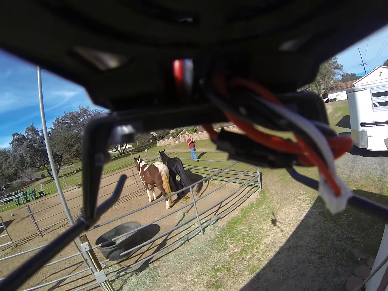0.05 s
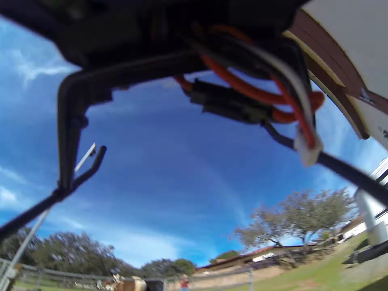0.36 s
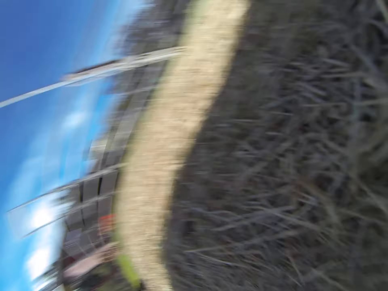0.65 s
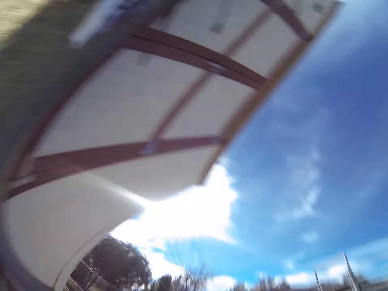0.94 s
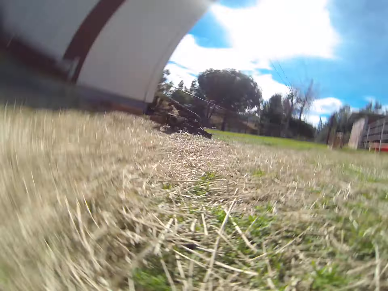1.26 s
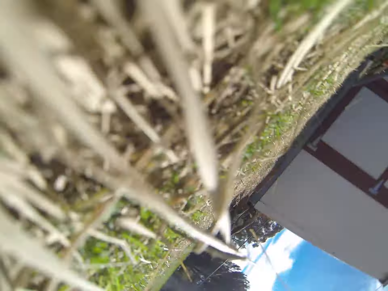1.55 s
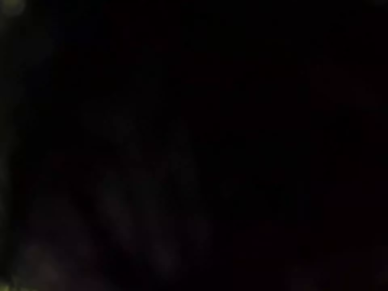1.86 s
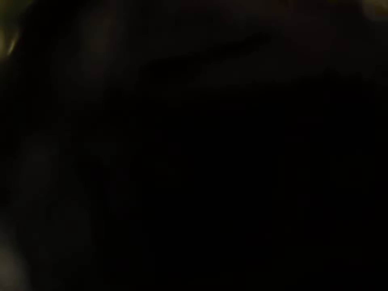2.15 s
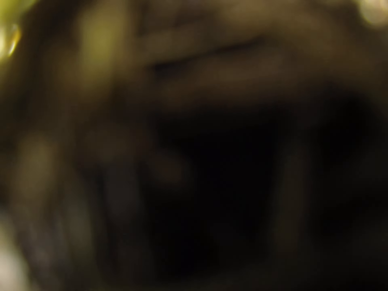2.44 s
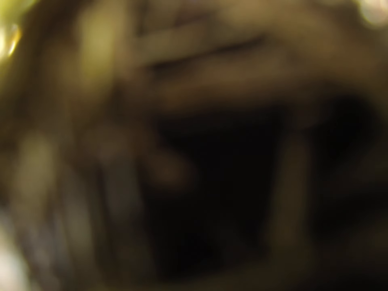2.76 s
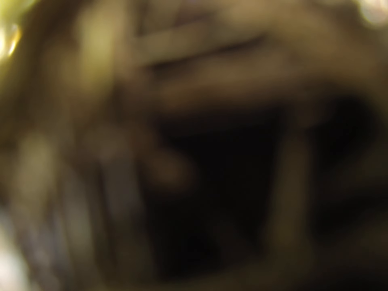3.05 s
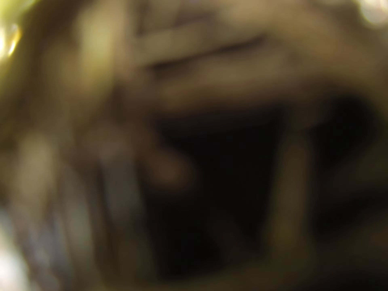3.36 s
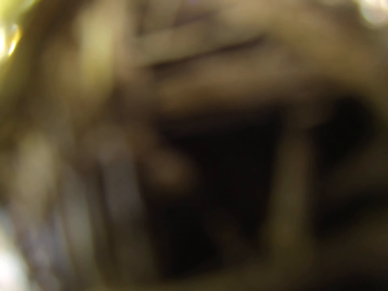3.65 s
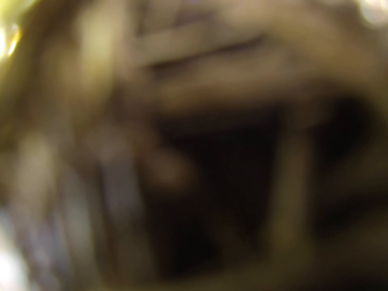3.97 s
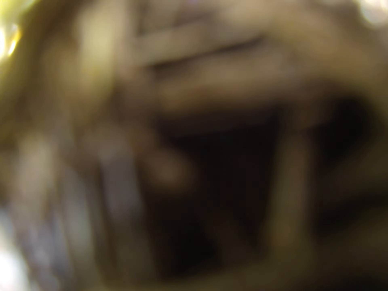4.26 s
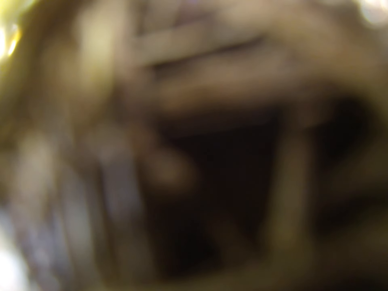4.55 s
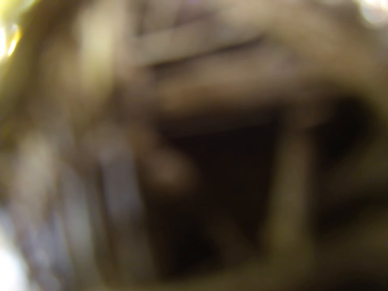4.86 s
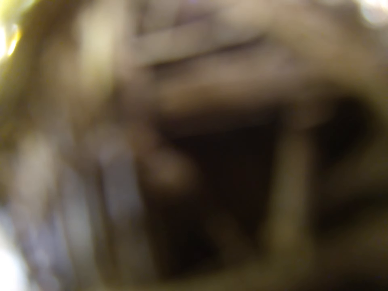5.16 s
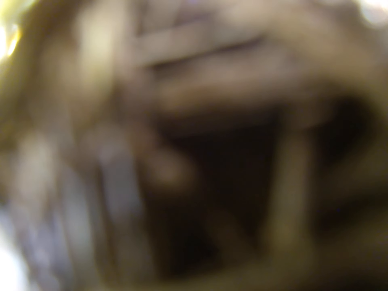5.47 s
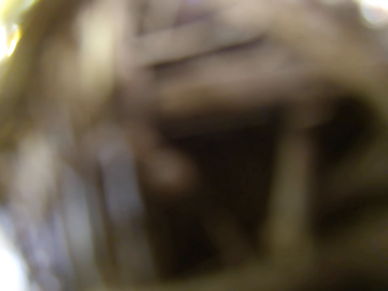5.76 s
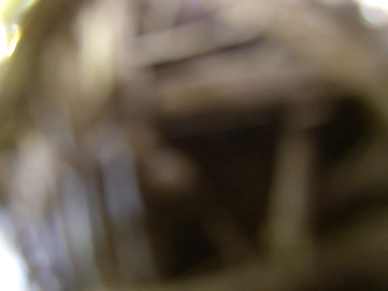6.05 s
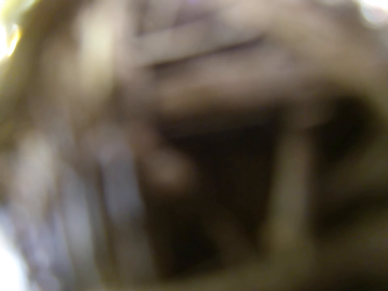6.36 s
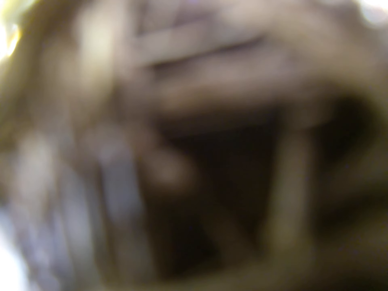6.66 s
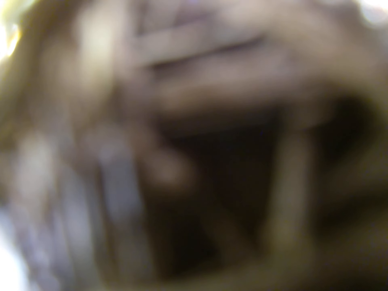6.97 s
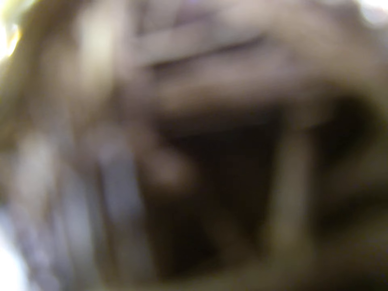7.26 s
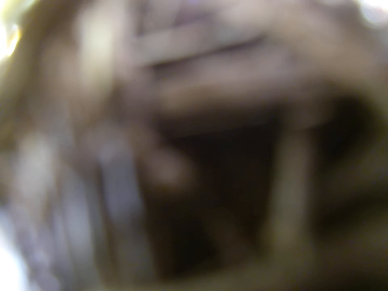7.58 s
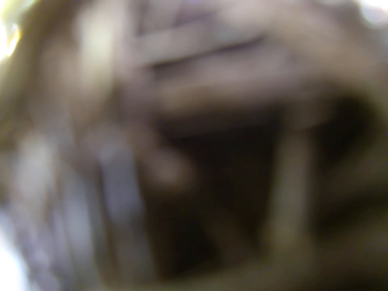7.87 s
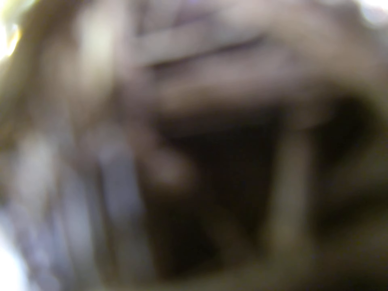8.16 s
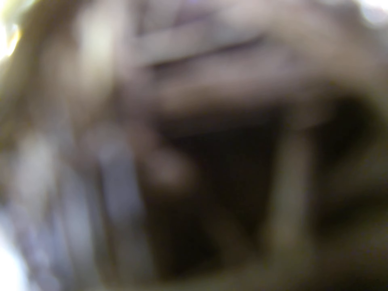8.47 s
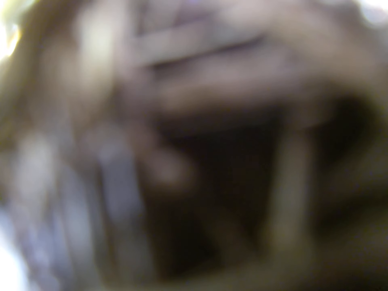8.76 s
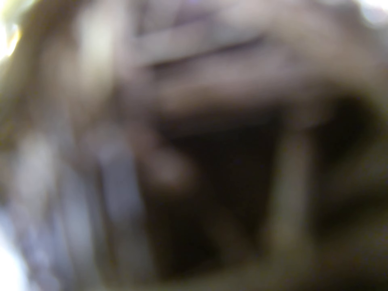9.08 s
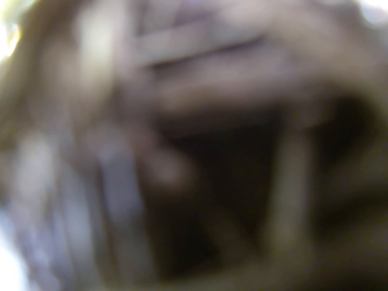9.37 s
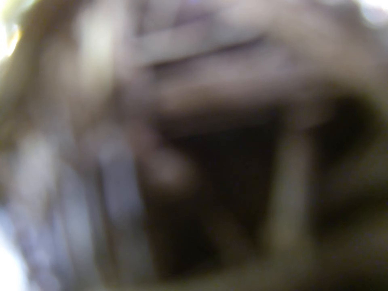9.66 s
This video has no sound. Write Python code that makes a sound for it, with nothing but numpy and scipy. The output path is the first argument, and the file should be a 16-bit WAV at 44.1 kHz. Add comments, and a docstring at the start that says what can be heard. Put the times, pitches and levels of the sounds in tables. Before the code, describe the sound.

Heard from on board, a model helicopter's rotors strike a wall and it crashes onto grass; then faint distant engines and soft footsteps.

```python
"""First comes the rasp of a small model helicopter, heard from on board, as its rotors grind along a wall.
The motors squeal, the plastic frame clatters, and air buffets the microphone, there and as it tumbles.
The craft thumps over dry grass, crushing the stalks, and settles. That leaves a quiet yard:
a machine hum, far engines and road noise, a whistling bird, and footsteps in the grass coming nearer."""
import sys
import numpy as np
from scipy import signal
from scipy.fft import rfft, irfft, next_fast_len
from scipy.io import wavfile

SR = 44100
rng = np.random.default_rng(int(sys.argv[2]) if len(sys.argv) > 2 else 0)


def to_wav(sig):
    """Store sig (one row per channel, or 1-D mono) as 16-bit WAV at the path in sys.argv[1].

    Samples outside -1..1 are clipped; the rate is SR.
    """
    pcm = np.clip(np.atleast_2d(sig), -1, 1) * 32767
    pcm = np.round(pcm).astype(np.int16)
    wavfile.write(sys.argv[1], SR, pcm.T)  # frames by channels


N = 433062
TIME = np.arange(N) / SR
FFT_SIZE = next_fast_len(N, real=True)
FREQS = np.fft.rfftfreq(FFT_SIZE, 1 / SR)


def amp(db):
    """Turns decibels into a number to multiply a sound by."""
    return np.exp(np.asarray(db) * (np.log(10) / 20))


def unit(x):
    """Scales a sound so that its average strength (rms) is 1."""
    return x / np.sqrt(np.mean(x ** 2) + 1e-20)


def colour(points):
    """Joins (Hz, dB) points into a gain for every frequency."""
    hz, db = np.transpose(points)
    return amp(np.interp(np.log(FREQS + 1), np.log(hz + 1), db))


def resonances(rows):
    """Gain for every frequency of an object that rings at the given (Hz, width in Hz, dB) peaks."""
    return sum(amp(db) / (1 + 2j * (FREQS - hz) / width) for hz, width, db in rows)


def shaped(x, gain):
    """Filters a full-length sound by a gain for every frequency, then scales it to strength 1."""
    return unit(irfft(rfft(x, FFT_SIZE) * gain, FFT_SIZE)[:N])


def band(x, hz, kind, order=2):
    """Keeps the "low" or the "high" side of hz."""
    return signal.sosfilt(signal.butter(order, min(hz, SR / 2 - 1), kind, fs=SR, output="sos"), x)


def treble(x, hz):
    """The part of a full-length sound above hz."""
    return x - irfft(rfft(x, FFT_SIZE) / (1 + (FREQS / hz) ** 4), FFT_SIZE)[:N]


def drift(hz):
    """A random wobble of strength 1, up to about hz times a second."""
    values = rng.standard_normal(16384)
    return unit(np.interp(TIME * hz * 2, np.arange(len(values)), values))


def grains(per_s, spread_db, hiss):
    """Random clicks of uneven size over a share of smooth hiss."""
    size = amp(spread_db * np.minimum(rng.exponential(1, N), 4))
    clicks = size * rng.choice([-1, 1], N) * (rng.random(N) < per_s / SR)
    return unit(unit(clicks) + hiss * rng.standard_normal(N))


def swells(times, heights, rise_s, fade_s, hold_s=0):
    """A loudness curve made of swells that each grow up to their time, hold, and die away."""
    out = np.zeros(N)
    for s, height, rise, fade, hold in np.broadcast(times, heights, rise_s, fade_s, hold_s):
        near = slice(max(int((s - 16 * rise) * SR), 0), int((s + hold + 16 * fade) * SR))
        t = TIME[near] - s
        out[near] += height * np.exp(np.minimum(np.minimum(t / rise, (hold - t) / fade), 0))
    return out


def until(s, fade_s):
    """Full loudness up to the time s, then dying away."""
    return np.exp(-np.clip((TIME - s) / fade_s, 0, 40))


def add_centred(mix, s, sound):
    """Mixes a sound in with its middle at the time s."""
    start = round(s * SR) - len(sound) // 2
    sound = sound[max(-start, 0):]
    part = mix[max(start, 0):][:len(sound)]
    part += sound[:len(part)]


def glides(rows, waver):
    """Short sliding tones whose pitch wavers by the given share."""
    out = np.zeros(N)
    for s, db, start_hz, end_hz, length in rows:
        shake = unit(band(rng.standard_normal(SR), 300, "low"))[:int(length * SR)]
        hz = np.linspace(start_hz, end_hz, len(shake)) * (1 + waver * shake)
        tone = np.sqrt(2) * np.sin(2 * np.pi * np.cumsum(hz) / SR)
        add_centred(out, s, amp(db) * np.hanning(len(hz)) * tone)
    return out


# The tone colour of the gears and blades. Each row: frequency in Hz, relative level in dB.
RASP_COLOUR = [(200, -26), (400, -1.5), (700, 2), (950, -10), (1350, -11), (1650, -4.5), (2400, -9.5),
               (4000, -11), (6000, -10), (9000, -13), (13000, -19.5), (15500, -28)]
# The ringing of the arms. Each row: pitch in Hz, width in Hz, relative level in dB.
ARM_RINGS = [(1660, 220, -7.5), (2215.6, 110, 9), (3030, 120, -8.5), (4180, 220, -3.5), (7740, 1300, -11),
             (9083, 400, -11)]


def rotors(stall_s=.113, coast_end_s=.9):
    """Gears and blades rasp through the ringing arms and throb as they wobble, until a blade catches."""
    throb_hz = 52 * (1 + .3 * drift(hz=7.6))
    throb = 1 + .19 * np.sin(2 * np.pi * np.cumsum(throb_hz) / SR)
    rasp = shaped(rng.standard_normal(N), colour(RASP_COLOUR) * (1 + 1.5 * resonances(ARM_RINGS)))
    rasp *= amp(1.2 * drift(hz=218))
    looseness = np.interp(TIME, [.1, .6], [amp(-13.5), amp(-1)])  # the blows shake the parts loose
    rattling = looseness * rattle(count=16, per_s=220, low_hz=2060, high_hz=4080)
    powered = amp(-20.5) * until(stall_s, fade_s=.002)
    coasting = amp(-48) * until(coast_end_s, fade_s=.04)
    return (rasp + rattling) * throb * (powered + coasting)


def rattle(count, per_s, low_hz, high_hz):
    """Loose parts chirp at random, each with a short falling ring at its own pitch."""
    out, t = np.zeros(N), np.arange(900) / SR
    span = 2 * SR
    envelope = np.exp(-t / .004) * (1 - np.exp(-t / .00065))
    for hz in np.geomspace(low_hz, high_hz, count):
        ring = envelope * np.sin(2 * np.pi * hz * t * (1 - 2 * t))
        taps = rng.uniform(.36, 1, span) * (rng.random(span) < per_s / count / SR)
        out[:span] += signal.oaconvolve(taps, ring)[:span]
    return out / np.std(out[:span])


# Motor squeals. Each row: middle in seconds, level in dB, first and last pitch in Hz, length in seconds.
MOTOR_SQUEALS = [(.022, -32.5, 1750, 1600, .06), (.032, -30.5, 2750, 1800, .06),
                 (.044, -23.5, 4350, 3250, .04), (.062, -30, 3550, 2950, .03),
                 (.094, -25.5, 4300, 3400, .04), (.09, -30, 2450, 1650, .05),
                 (.095, -33.5, 6200, 5300, .04)]


def squeals():
    """The motors squeal downward as the wall brakes them."""
    return glides(MOTOR_SQUEALS, waver=.012)


# Gusts on the microphone. Each row: middle in seconds, level in dB, half length in seconds,
# brightness in Hz (the gust's two treble cuts sit below and above it).
AIR_GUSTS = [(0.056, -23.5, 0.063, 116), (0.157, -16.5, 0.0044, 298), (0.393, -19.5, 0.071, 171),
             (0.571, -21.5, 0.037, 240), (0.647, -26.5, 0.014, 235), (.75, -20, .011, 247.5),
             (0.846, -17, 0.0087, 456), (.917, -11, 0.01, 405), (1.009, -14, 0.02, 185),
             (1.075, -17.5, 0.0054, 223), (1.18, -26, 0.0061, 285), (1.222, -17.5, 0.016, 270)]


def gusts():
    """Air buffets the microphone along the wall, then in short gusts during the tumble."""
    out, t = np.zeros(N), np.arange(-4096, 4096) / SR
    for s, db, half_s, brightness_hz in AIR_GUSTS:
        speed = np.exp(-(t / half_s) ** 2 / 2)
        swirls = band(rng.standard_normal(len(t)), 31, "high")
        dull = unit(band(swirls, brightness_hz * .6, "low", order=3))
        bright = unit(band(swirls, brightness_hz * 1.476, "low", order=4))
        gust = unit(speed * dull + .64 * speed ** 2 * bright)  # brightest in the middle
        add_centred(out, s, amp(db) * gust * np.sqrt(np.mean(speed ** 2)))
    return out


def sway(fall_end_s=1.06, roll_start_s=1.22):
    """Tumbling slowly pushes the air: a deep rumble that grows in the fall and is weaker in the roll."""
    deep = colour([(4, -22.5), (12, -3), (25, -9), (50, -18.5), (150, -54), (600, -110)])
    rumble = shaped(rng.standard_normal(N), deep)
    falling = amp(-30 + 11.5 * np.minimum(TIME, fall_end_s)) * until(fall_end_s, fade_s=.03)
    rolling = swells(roll_start_s, amp(-35.5), rise_s=.03, fade_s=.03, hold_s=.7)
    return rumble * (falling + rolling)


# The tone colour of rubbed or struck plastic. Each row: frequency in Hz, relative level in dB.
PLASTIC_COLOUR = [(60, -21.5), (130, -4), (300, -4.5), (750, -3.5), (1100, -7.5), (2200, -8.5),
                  (4000, -14.5), (6000, -19.5), (12500, -25.5), (15500, -35.5)]
# The ringing of the frame. Each row: pitch in Hz, width in Hz, relative level in dB.
FRAME_RINGS = [(490.3, 99, 4), (744, 140, -7.5), (1618, 65, 1), (2180, 190, 11), (2740, 84, -3.5),
               (4260, 400, -4)]


def through_frame(x, ringing=.47):
    """Whatever touches the plastic frame sets off the same short rings."""
    return shaped(x, colour(PLASTIC_COLOUR) * (1 + ringing * resonances(FRAME_RINGS)))


# Blows on the frame. Each row: time in seconds, level in dB, bass boost in dB.
FRAME_BLOWS = [(.112, -9, -1), (0.138, -18, -3), (.152, -8.5, -5), (0.186, -20.5, -10), (.204, -21.5, 2),
               (0.3269, -12.5, 3), (0.3728, -13, 5), (0.467, -36.5, 19), (0.5273, -3, -4.5),
               (0.556, -18.5, 9), (.574, -17.5, 2.5), (.5913, -35, 8), (0.616, -25.5, 13.5),
               (0.837, -29, -19), (.875, -39, -6), (0.899, -33.5, -5), (.985, -45, -6), (1.0222, -48.5, 9),
               (1.132, -53, -6), (1.4459, -13, 0.5)]


def knocks():
    """Each blow cracks through the frame; lighter blows are thinner ticks."""
    s, db, bass_db = np.transpose(FRAME_BLOWS)
    treble_db = 2 - .2743 * db
    crack = through_frame(rng.standard_normal(N))
    bass, top = band(crack, 900, "low"), treble(crack, 5000)
    parts = [(crack, 1), (bass, amp(bass_db) - 1), (top, amp(treble_db) - 1)]
    return sum(part * swells(s, amp(db) * share, rise_s=.00014, fade_s=.0045) for part, share in parts)


# Jolts to the frame. Each row: middle in seconds, level in dB, pitch in Hz, half length in seconds,
# slide as a share of the pitch per second.
FRAME_JOLTS = [(0.1182, -1.5, 439, 0.0036, 38), (.5582, -4, 776, 0.0012, 1), (.9153, -2.5, 436, 0.0015, -3),
               (1.007, -11, 450, 0.00063, 0)]


def judders():
    """A caught blade or a hard jolt shakes the frame for a few cycles; bending shifts its pitch."""
    out, t = np.zeros(N), np.arange(-900, 900) / SR
    for s, db, hz, half_s, slide in FRAME_JOLTS:
        shake = np.sin(2 * np.pi * hz * (t + slide * t ** 2 / 2))
        add_centred(out, s, amp(db) * np.exp(-(t / half_s) ** 2 / 2) * shake)
    return out


# Scrapes on the wall. Each row: start in seconds, length in seconds, level in dB.
WALL_SCRAPES = [(0.128, 0.1, -28.5), (0.259, .055, -26), (0.332, .062, -24.5), (.475, .04, -42.5),
                (0.528, .047, -19)]


def scrapes():
    """The frame drags along the wall with a gritty, uneven rub."""
    start, length, db = np.transpose(WALL_SCRAPES)
    contact = swells(start, amp(db), rise_s=.0013, fade_s=.01, hold_s=length)
    rub = through_frame(grains(per_s=2200, spread_db=2, hiss=.7))
    return rub * contact * amp(2.2 * drift(hz=131.4))


def ticks():
    """Loose plastic parts tick faintly at random while the craft tumbles."""
    clicks = through_frame(grains(per_s=350, spread_db=5, hiss=.1), ringing=2.8)
    thin = unit(band(clicks, 1700, "high") + .58 * treble(clicks, 6000))
    return thin * swells(.132, amp(-53.5), rise_s=.02, fade_s=.091, hold_s=.82)


# Bounces, first off the wall, then on the turf. Each row: time in seconds, thump peak in dB, rise in
# seconds, push (1) or pull (-1) on the air, crackle level in dB, crackle length in seconds.
CRAFT_BOUNCES = [(.577, -5.5, .0004, -1, -34, .002), (1.0918, 0.5, 0.00089, -1, -30.5, 0.0043),
                 (1.3153, 6.5, .0007, -1, -25.5, 0.0038), (1.4659, -1.5, 0.0011, 1, -19, 0.011),
                 (1.517, -17, 0.0013, -1, -48.5, 0.0057), (1.655, 2, 0.00092, 1, -22, 0.0049),
                 (1.749, -7, 0.0013, 1, -24.5, 0.014), (1.899, -8.5, 0.00012, 1, -26, 0.0019)]


def thumps(release_per_rise=8.2):
    """Each bounce jolts the air at the microphone quickly and lets it go slowly."""
    out, t = np.zeros(N), np.arange(-2048, 2048) / SR
    for s, db, rise, sign, _, _ in CRAFT_BOUNCES:
        pulse = np.exp(-np.logaddexp(-t / rise, t / (rise * release_per_rise)))
        push = np.gradient(pulse)
        add_centred(out, s, sign * amp(db) * push / push.max())
    return out


def thuds(pitch_hz=420, width_hz=300):
    """The frame answers each bounce with a short, dull thud, quieter than the thump."""
    s, thump_db = np.transpose(CRAFT_BOUNCES)[:2]
    ring = shaped(rng.standard_normal(N), resonances([(pitch_hz, width_hz, 0)]) ** 2)
    return ring * swells(s, amp(thump_db - 23.5), rise_s=.0038, fade_s=.0031)


# The tone colour of the dry crackle. Each row: frequency in Hz, relative level in dB.
CRACKLE_COLOUR = [(180, -42), (300, 2), (391, -6), (600, -0.5), (1970, -3), (2170, -2), (2830, -6),
                  (7250, -8), (12100, -12), (15500, -17.5)]
# Lurches as the craft slides through the grass. Each row: time in seconds, level in dB, rise in seconds.
GRASS_LURCHES = [(1.201, -57, 0.02), (1.746, -29.5, 0.011), (1.872, -28, .025), (1.964, -34, 0.012),
                 (2.002, -50, .008), (2.045, -42.5, 0.0048)]


def crackles(faint_lead_s=.028):
    """A dry crackle comes just before each thump; on the turf and in the slide it is crushed stalks."""
    s, _, _, _, db, loud_s = np.transpose(CRAFT_BOUNCES)
    faint_s = loud_s + faint_lead_s
    faint = swells(s - faint_s, amp(db - 26), rise_s=.008, fade_s=.011, hold_s=faint_s)
    loud = swells(s - loud_s, amp(db), rise_s=.0007, fade_s=.0016, hold_s=loud_s)
    s, db, rise_s = np.transpose(GRASS_LURCHES)
    slide_power = swells(s, amp(db) ** 2, rise_s / 2, fade_s=.0195)
    crackle = shaped(grains(per_s=2000, spread_db=4, hiss=1), colour(CRACKLE_COLOUR))
    return crackle * np.sqrt(faint ** 2 + loud ** 2 + slide_power)  # overlapping noises add in power


# Breaking stalks. Each row: start in seconds, peak in dB, middle frequency in Hz.
STALK_SNAPS = [(1.098, -24.5, 8500), (1.777, -25, 3000), (1.786, -23, 9100), (1.815, -18.5, 11400),
               (1.834, -24, 12000), (1.8526, -19, 2150), (1.958, -27, 3000), (2.041, -28, 2380),
               (2.058, -26, 3100), (2.1112, -36.5, 3930), (3.291, -47, 6430), (5.523, -40, 2180),
               (9.019, -26, 1590)]


def snaps():
    """Single stalks snap, each a tiny burst of noise one octave wide."""
    out, t = np.zeros(N), np.arange(-600, 600) / SR
    for s, db, hz in STALK_SNAPS:
        burst = rng.standard_normal(len(t)) * np.exp(-abs(t) / .0018) * (t >= 0)
        thin = band(burst, hz / np.sqrt(2), "high")
        snap = band(thin, hz * np.sqrt(2), "low", order=4)
        add_centred(out, s, amp(db) * snap / abs(snap).max())
    return out


# The tone colour of the open air. Each row: frequency in Hz, relative level in dB.
AIR_COLOUR = [(12, -22.5), (25, 5), (60, 2.5), (130, -10.5), (300, -14), (500, -26.5), (1000, -27.5),
              (2500, -32.5), (4200, -39.5), (6000, -47.5), (8300, -51.5), (12500, -61), (14000, -68),
              (15500, -79.5)]


def open_air():
    """The air in the yard makes a soft, low rush."""
    return amp(-44) * shaped(rng.standard_normal(N), colour(AIR_COLOUR))


# The tones of a far machine. Each row: pitch in Hz, level in dB before the boost.
MACHINE_TONES = [(468.3, -69.5), (549.1, -69.5), (602.9, -70.5), (877.5, -77), (904.4, -73), (1012, -71.5),
                 (1039, -69), (1152, -80.5), (1206, -77.5), (1346, -78), (1373, -74.5), (1480, -74),
                 (1949, -78.5), (2010, -79), (2412, -76.5)]


def machine_hum(boost_db=3):
    """A far machine hums steady tones, each growing louder and softer by itself."""
    out, moments = np.zeros(N), np.linspace(0, TIME[-1], 24)
    for hz, db in MACHINE_TONES:
        fading, wander = (np.interp(TIME, moments, v) for v in rng.standard_normal((2, len(moments))))
        out += amp(db + boost_db + 2.2 * fading) * np.sin(2 * np.pi * hz * TIME + 1.2 * wander)
    return out


# The tone colour of a far road. Each row: frequency in Hz, relative level in dB.
ROAD_COLOUR = [(25, 8.5), (75, -6), (200, -2), (350, 0), (700, -12.5), (1500, -23), (5000, -45)]
# How loud the road is. Each row: time in seconds, level in dB before the boost.
ROAD_LEVELS = [(2, -61), (3.9, -57), (7.3, -57), (8.9, -51.5), (9.82, -50.5)]


def road(boost_db=2):
    """Far traffic rumbles, slowly growing louder."""
    s, db = np.transpose(ROAD_LEVELS)
    loudness = amp(boost_db + np.interp(TIME, s, db, left=-140, right=-140))
    return loudness * shaped(rng.standard_normal(N), colour(ROAD_COLOUR))


# Far engines, one list for each. Each row: time in seconds, firings per second, level in dB.
FAR_ENGINES = [
    [(6.9, 78, -46), (7.8, 73.2, -40), (8.1, 75.3, -50), (8.6, 75.2, -40), (9.82, 73.9, -46.5)],
    [(2, 149.6, -52), (3, 150.8, -49.5), (3.6, 150.9, -60.5), (5, 151.2, -57), (6.3, 151.7, -56.5)],
    [(5.6, 86, -42), (5.9, 97, -51), (6.4, 106.7, -44.5), (6.8, 110.6, -46.5)],
    [(7.95, 285.6, -52), (8.3, 309.8, -54), (8.85, 335.3, -54)],
]


def engines():
    """Each far exhaust gives a slightly wavering firing tone and a weaker tone an octave up."""
    out = np.zeros(N)
    for rows in FAR_ENGINES:
        s, hz, db = np.transpose(rows)
        firing_hz = np.interp(TIME, s, hz) * (1 + .00489 * drift(hz=4.4))
        phase = 2 * np.pi * np.cumsum(firing_hz) / SR
        heard = swells(s[0], 1, rise_s=.17, fade_s=.17, hold_s=s[-1] - s[0])
        loudness = amp(np.interp(TIME, s, db) + 1.2 * drift(hz=5))
        out += heard * loudness * (np.sin(phase) + amp(-13.5) * np.sin(2 * phase))
    return out


# The wreck's slips. Each row: time in seconds, level in dB.
WRECK_SLIPS = [(2.426, -42), (2.443, -45.5), (2.462, -47), (2.479, -51)]
# The tone colour of the turf under it. Each row: frequency in Hz, relative level in dB.
TURF_COLOUR = [(350, -30), (700, 9), (1100, -3.5), (2300, 4), (3200, -9), (5500, -20.5), (7500, -24),
               (9000, -31), (15000, -42.5)]


def settling(creeps=10, creep_from_s=2.515, creep_every_s=.043):
    """The wreck sinks into the turf in a few dry slips, then creeps on in tiny, uneven ones."""
    s, db = np.transpose(WRECK_SLIPS)
    slips = swells(s, amp(db), rise_s=.002, fade_s=.012)
    jitter, size = rng.standard_normal((creeps, 2)).T
    after_s = creep_every_s * (np.arange(creeps) + .2 * jitter)
    creep_db = -54.5 - 6 * after_s + .5 * size
    creep = swells(creep_from_s + after_s, amp(creep_db), rise_s=.0057, fade_s=.014)
    rustle = shaped(grains(per_s=3900, spread_db=5, hiss=.92), colour(TURF_COLOUR))
    return rustle * (slips + creep)


# Bird calls. Each row: middle in seconds, level in dB, first and last pitch in Hz, length in seconds.
BIRD_WHISTLES = [(4.27, -72.5, 3500, 3150, 0.11), (5.25, -73, 3730, 2900, .2)]


def bird():
    """A far bird gives thin, falling whistles."""
    return glides(BIRD_WHISTLES, waver=.004)


# Steps in the grass. Each row: heel landing in seconds, crunch level in dB, swish level in dB,
# head start of the swish in seconds, treble boost in dB.
FOOTFALLS = [(4.549, -52.5, -70, .01, -4), (4.956, -42.5, -65.5, .01, -7), (5.524, -51.5, -59, 0.011, 3),
             (6.37, -48.5, -74, .01, -2), (7.72, -69.5, -51, 0.066, -5.5), (8.251, -43, -54, .06, -26),
             (8.47, -65.5, -54.5, 0.072, -12), (8.996, -41, -48.5, 0.093, 4), (9.56, -51.5, -44.5, .012, 1),
             (9.741, -63, -51.5, 0.026, 13.5)]
# The tone colour of turf under a shoe. Each row: frequency in Hz, relative level in dB.
TREAD_COLOUR = [(150, 14), (400, 2.5), (900, 6.5), (2200, -3), (4500, -15.5), (8000, -33.5), (15000, -45.5)]


def footsteps(heel_to_toe_s=.025):
    """Each foot swishes through the grass, then heel and toe crush the turf with a dull crunch."""
    s, db, swish_db, lead_s, treble_db = np.transpose(FOOTFALLS)
    crunch = shaped(grains(per_s=900, spread_db=4.5, hiss=.91), colour(TREAD_COLOUR))
    out = np.zeros(N)
    for part, share in [(crunch, 1), (treble(crunch, 2540), amp(treble_db) - 1)]:
        swish = swells(s - lead_s, amp(swish_db) * share, rise_s=.019, fade_s=.11, hold_s=lead_s + .028)
        heel = swells(s, amp(db) * share, rise_s=.0026, fade_s=.0086)
        toe = swells(s + heel_to_toe_s, amp(db - .5) * share, rise_s=.0026, fade_s=.0086)
        out += part * (swish + heel + toe)
    return out


def scene():
    """The crash and the yard around it, in one channel."""
    crash = rotors() + squeals() + scrapes() + knocks() + ticks() + judders() + gusts() + sway()
    landing = thumps() + thuds() + crackles() + snaps() + settling()
    fade_up = np.interp(TIME, [1.6, 2.1], [amp(-7), 1])  # air and hum are fainter during the crash
    yard = footsteps() + engines() + fade_up * open_air() + road() + fade_up * machine_hum() + bird()
    return (crash + landing + yard)[None]


def record(dry, top_hz=15700):
    """The small camera flattens peaks that are too loud and cuts the highest treble."""
    treble_cut = signal.firwin(301, top_hz, window=("kaiser", 9), fs=SR)
    return signal.oaconvolve(np.clip(dry, -1, 1), treble_cut[None], "same")


dry = scene()
out = record(dry)
to_wav(out)
```